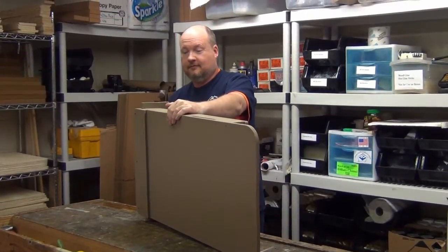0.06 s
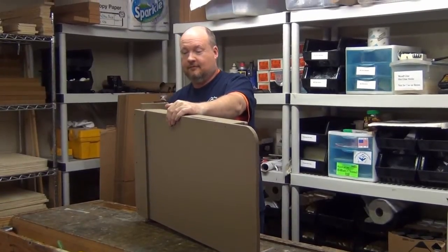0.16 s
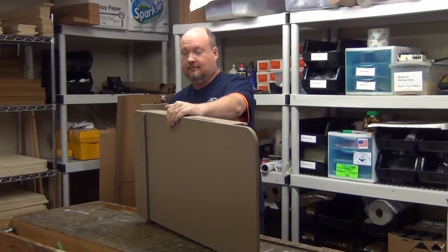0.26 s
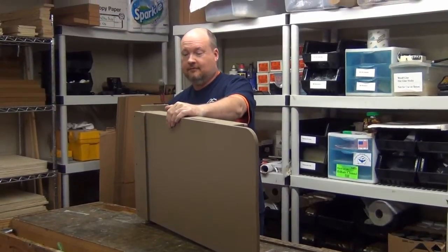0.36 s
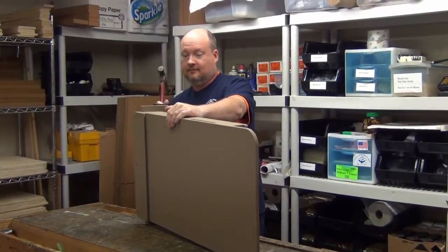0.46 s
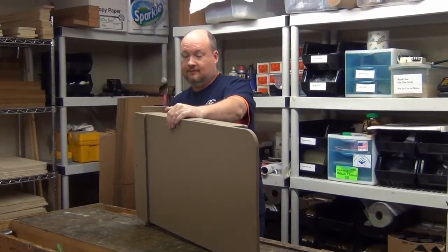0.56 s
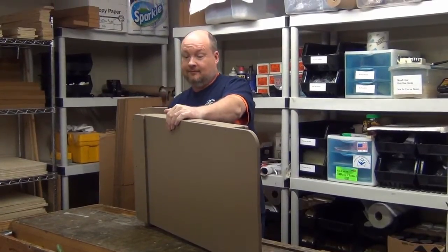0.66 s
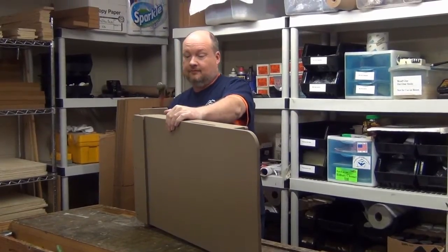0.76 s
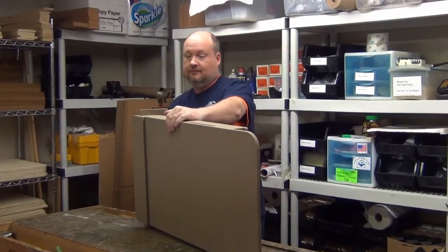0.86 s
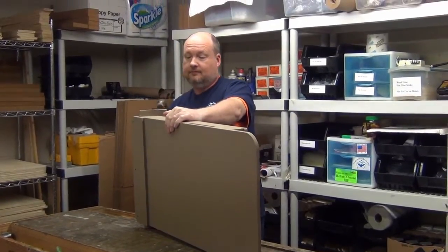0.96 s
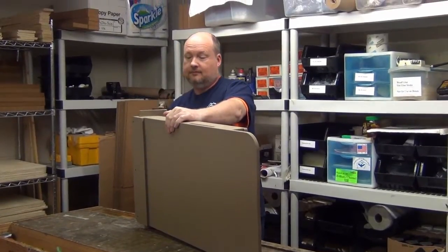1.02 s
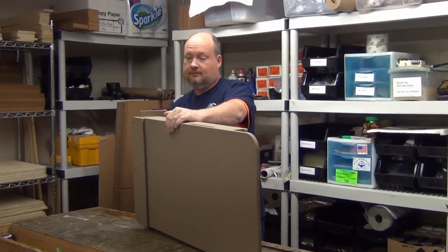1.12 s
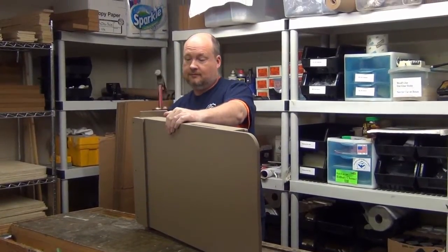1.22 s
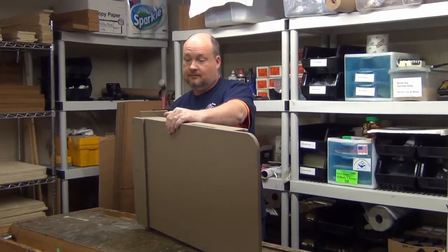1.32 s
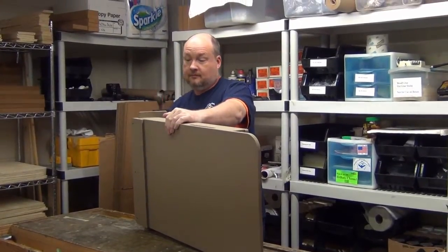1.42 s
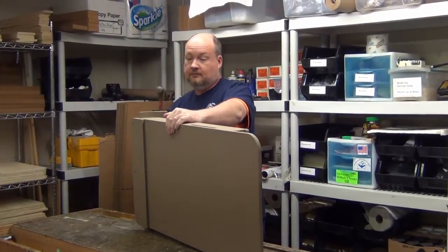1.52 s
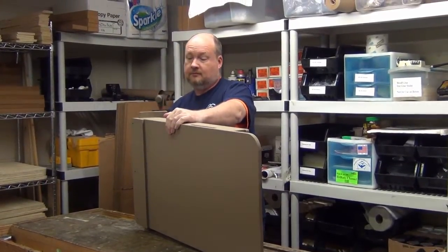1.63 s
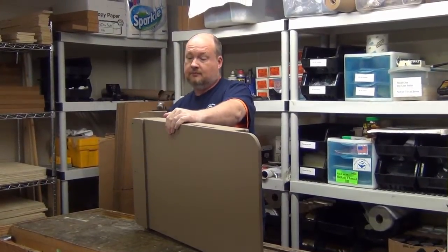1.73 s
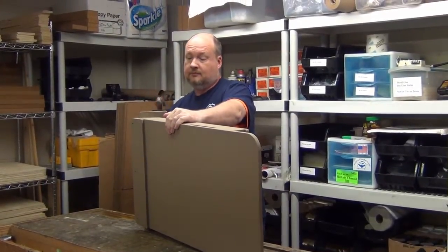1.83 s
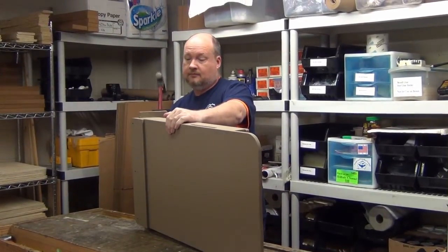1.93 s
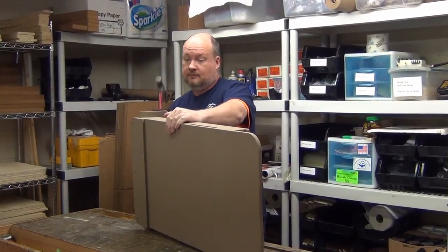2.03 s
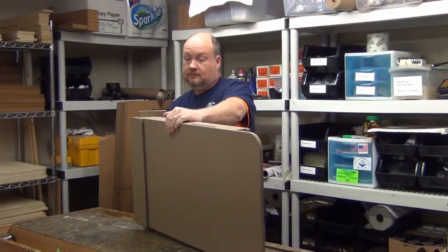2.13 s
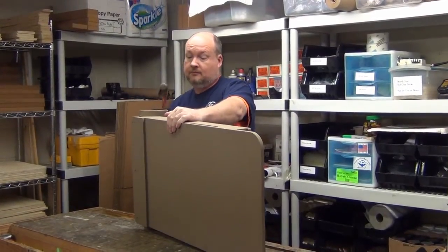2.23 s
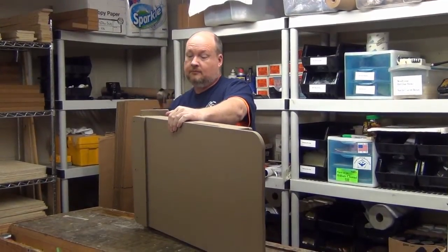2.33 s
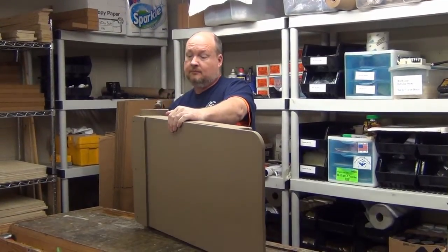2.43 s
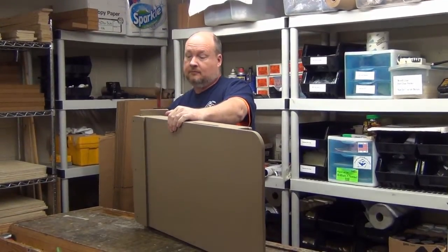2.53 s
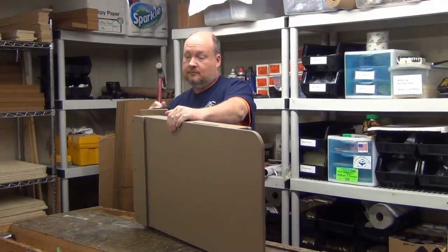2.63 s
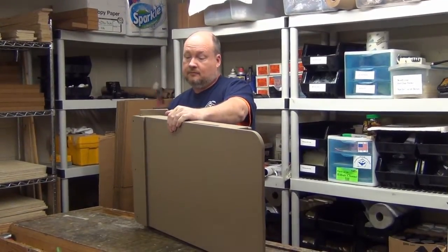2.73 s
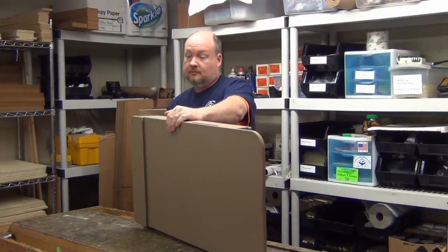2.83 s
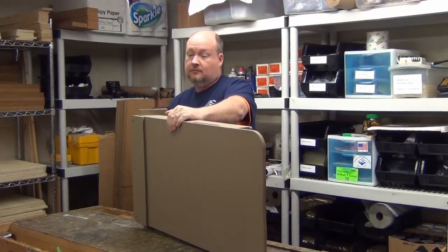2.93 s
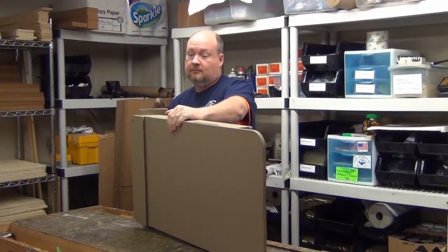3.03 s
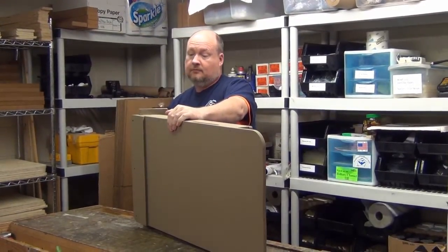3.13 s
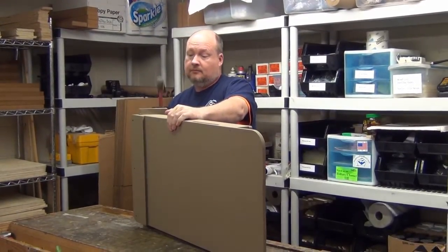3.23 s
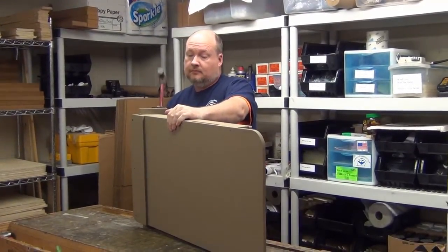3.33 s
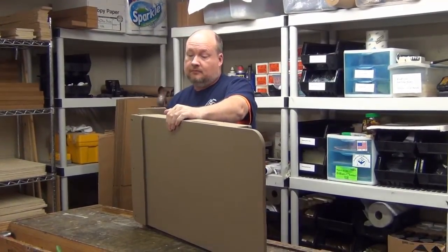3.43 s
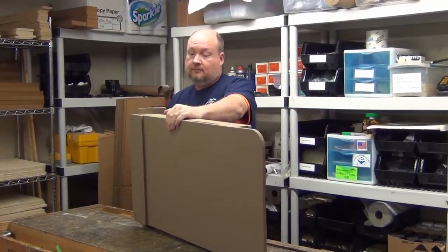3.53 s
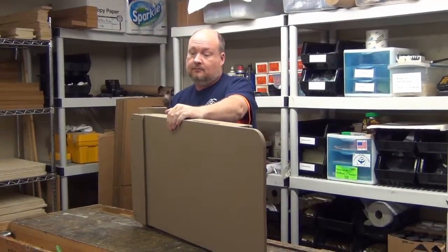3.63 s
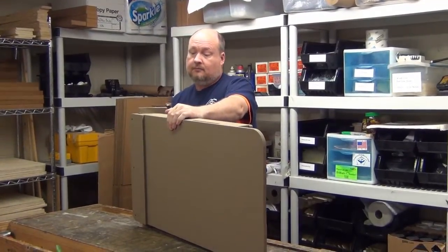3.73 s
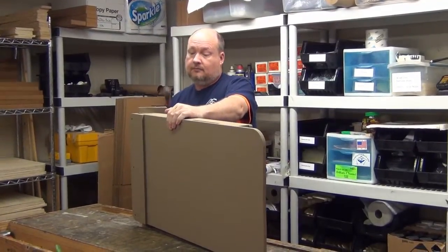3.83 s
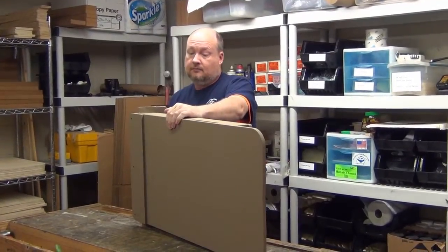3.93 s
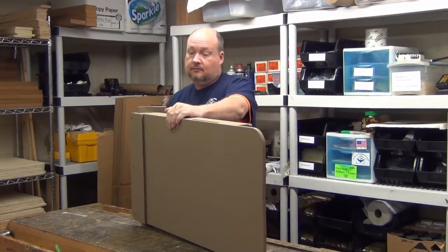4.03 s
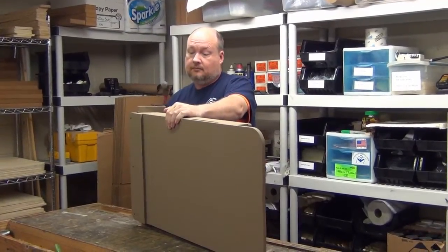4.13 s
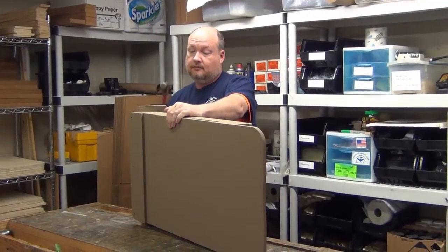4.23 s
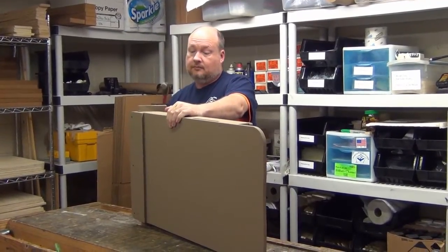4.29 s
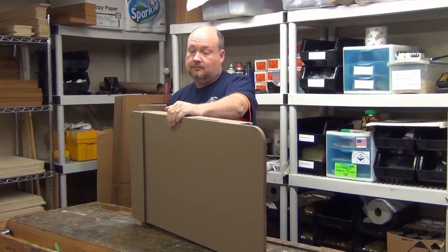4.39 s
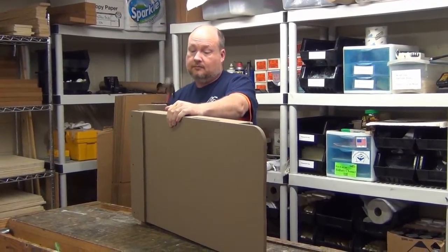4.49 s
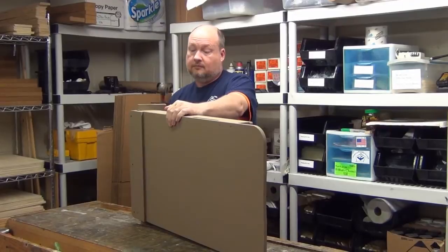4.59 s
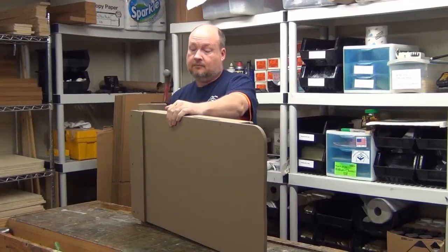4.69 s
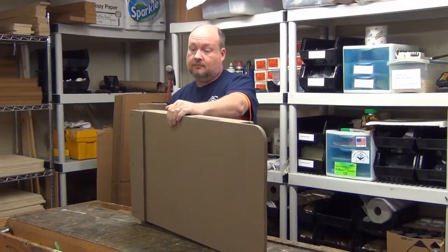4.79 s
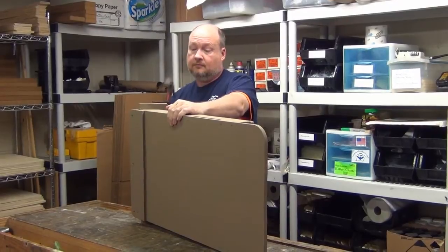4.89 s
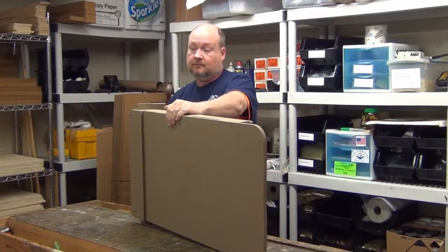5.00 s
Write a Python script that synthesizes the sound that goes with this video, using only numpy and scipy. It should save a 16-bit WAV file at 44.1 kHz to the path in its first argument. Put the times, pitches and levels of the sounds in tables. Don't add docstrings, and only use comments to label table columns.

```python
import sys
import numpy as np
from scipy import signal
from scipy.fft import rfft, irfft
from scipy.io import wavfile
from scipy.ndimage import uniform_filter1d

SR = 44100
rng = np.random.default_rng(int(sys.argv[2]) if len(sys.argv) > 2 else 0)


def voltage_ratio(decibels):
    exponent = np.asarray(decibels, float) / 20
    return 10 ** exponent


def int16_out(signal):
    q = np.round(np.clip(np.atleast_2d(signal).T, -1, 1) * 32767)
    wavfile.write(sys.argv[1], SR, q.astype(np.int16))


N = 222873

# frequency [Hz], rise time [s].
RISE = [(60, 0.052), (200, 0.0073), (450, 0.015), (1500, 0.0081), (4000, 0.012), (8000, 0.018)]


def evened(x):
    return x / np.sqrt(np.mean(x ** 2) + 1e-20)


def read(points, hz):
    f, value = np.transpose(points)
    return np.interp(np.log(hz + 1), np.log(f + 1), value)


def curve(points):
    return np.interp(np.arange(N) / SR, *np.transpose(points))


def add(mix, start_s, sound):
    at = round(start_s * SR)
    sound = sound[..., max(-at, 0):]
    part = mix[..., max(at, 0):][..., :sound.shape[-1]]
    part += sound[..., :part.shape[-1]]


def band(x, hz, width_hz):
    return signal.lfilter(*signal.iirpeak(min(hz, SR * 0.45), hz / width_hz, SR), x)


def decay(t, t60_s):
    return voltage_ratio(-60 * t / t60_s)


def attack(t, rise_s):
    return np.minimum(t / rise_s, 1)


def sine(t, hz):
    return np.sin(2 * np.pi * hz * t)


def pair(shape_db, same, size):
    a, b, c, d = rng.standard_normal((shape_db.shape[1], shape_db.shape[0], 4)).T
    same = np.clip(read(same, np.fft.rfftfreq(size, 1 / SR)), -1, 1)[:, None]
    left = a + 1j * b
    right = same * left + np.sqrt(1 - same ** 2) * (c + 1j * d)
    z = np.array([left, right]) * voltage_ratio(shape_db)
    return signal.istft(z, nperseg=size, noverlap=size * 3 // 4)[1]


def patches(frames, wide, long):
    field = rng.standard_normal((frames, 513)).T
    return evened(uniform_filter1d(uniform_filter1d(field, wide, axis=0), long, axis=1))


def drone(hz, db, wander_hz):
    drift, swell = (evened(uniform_filter1d(rng.standard_normal(N), SR // 10)) for _ in range(2))
    turns = np.cumsum(hz + wander_hz * drift) / SR
    return voltage_ratio(db + 1.2 * swell) * np.sqrt(2) * np.sin(2 * np.pi * turns)


def workshop():
    # frequency [Hz], density [dB per Hz].
    air_shape = [(25, -44), (60, 5), (95, -5), (140, -2.5), (300, 0.5), (500, -10.5), (1060, -9),
                 (2080, -16.5), (5500, -20.5), (7200, -16), (10500, -24.5), (13500, -26.5), (16000, -22)]
    # time [s], level [dB].
    air_level = [(0, -52.5), (2.7, -54.5), (4.05, -54), (4.6, -50.3)]
    # frequency [Hz], left-right likeness [-1 to 1].
    air_same = [(60, 0.59), (180, 0.85), (550, 0.82), (1650, 0.99), (4970, 0.97), (15000, 0.56)]
    # frequency [Hz], level [dB], wander [Hz].
    hum_lines = [(361, -64.5, 1), (480, -69, 1), (247, -71, 2), (632, -75, 2), (1050, -74, 6),
                 (1203, -76, 3)]
    # frequency [Hz], level [dB], wander [Hz].
    motor_lines = [(120, -59, 1), (174, -67, 1)]
    # time [s], share [0-1].
    handover = [(0, 0), (1.45, 0.1), (1.9, 0.8), (3, 1)]
    bins = np.fft.rfftfreq(1024, 1 / SR)
    air_db = read(air_shape, bins)[:, None] + 1.2 * patches(N // 256 + 5, 10, 12)
    air = voltage_ratio(curve(air_level)) * evened(pair(air_db, air_same, size=1024)[:, :N])
    share = curve(handover)
    motor = (1 - 0.9 * share) * drone(*motor_lines[0]) + (1 + 0.6 * share) * drone(*motor_lines[1])
    return air + sum(drone(*row) for row in hum_lines) + motor


def camera():
    # start [s], end [s], frequency [Hz], level [dB].
    chirp_tones = [
        (0, 1.5, 2915, -60),
        (0, 1.5, 4490, -66),
        (2.9, 3.75, 3165, -65),
        (2.9, 3.75, 4740, -64),
        (3.75, 5.05, 3110, -65),
        (3.75, 5.05, 4670, -62.5),
    ]
    frame_s, whine_hz, whine_db = 1001 / 30000, 15735, -73
    t = np.arange(N) / SR
    from_chirp_s = ((t / frame_s + 0.5) % 1 - 0.5 - 0.03) * frame_s
    gate = np.exp(-0.5 * (from_chirp_s / 0.004) ** 2)
    size = voltage_ratio(1.2 * rng.standard_normal(200))[np.round(t / frame_s).astype(int)]
    throb_db = 4 * np.sin(2 * np.pi * t / 0.09)
    out = voltage_ratio(whine_db + throb_db) * np.sqrt(2) * sine(t, whine_hz)
    for start_s, end_s, hz, db in chirp_tones:
        running = (t > start_s) & (t < end_s)
        out = out + voltage_ratio(db) * np.sqrt(2) * running * gate * size * sine(t, hz)
    return out


def click():
    start_s, db, first_hz, second_hz = (0.5845, -33, 5100, 2600)
    t, out = np.arange(400) / SR, np.zeros(500)
    add(out, 0, decay(t, 0.007) * sine(t, first_hz))
    add(out, 0.0016, decay(t, 0.003) * sine(t, second_hz))
    return start_s, voltage_ratio(db) * out


def knock(start_s, db, hz, t60_s):
    t = np.arange(SR // 4) / SR
    noise = rng.standard_normal((2, len(t)))
    scuff = band(band(noise[0], 0.9 * hz, 1400), hz, 2200)
    tap = decay(t, max(t60_s, 0.01)) * attack(t, 0.0061) * (0.41 * sine(t, hz) + scuff)
    drag = decay(t, 0.29) * attack(t, 0.028) * band(band(noise[1], 260, 750), 350, 1600)
    return start_s, voltage_ratio(db - 0.5) * (tap + 0.9 * drag)


def slide(start_s, db):
    hiss_hz, rise_s, t60_s = 7400, 0.0069, 0.19
    t = np.arange(SR // 4) / SR
    noise = rng.standard_normal((2, len(t)))
    noise = noise[0] + 0.35 * noise
    hiss = band(band(band(noise, hiss_hz, 2700), hiss_hz, 2700), hiss_hz, 6000)
    scrape = 0.15 * band(noise, 3500, 5000)
    return start_s, voltage_ratio(db - 60 * t / t60_s) * attack(t, rise_s) * (hiss + scrape)


def tick(start_s, db, hiss_db):
    hard_db = db + 30
    hz = 9100 + 9 * hard_db
    hiss_t60_s = 0.24 + 0.004 * hard_db
    t = np.arange(SR // 3) / SR
    noise = rng.standard_normal((2, len(t)))
    noise = noise[0] + 0.52 * noise
    hits = 30.0 * (rng.random(len(t)) < 150 / SR)
    grains = noise * (1 + 0.8 * uniform_filter1d(hits, size=30))
    ping = 0.6 * band(band(noise, hz, 5000), hz, 5000) + 0.5 * sine(t, hz)
    snap = decay(t, 0.0045) * attack(t, 0.0003) * ping
    hiss = voltage_ratio(hiss_db - 60 * t / max(hiss_t60_s, 0.01)) * attack(t, 0.0022)
    hiss = hiss * band(band(grains, 8300, 4700), 8950, 4400)
    lowpass = signal.butter(2, 12500, fs=SR, output="sos")
    return start_s, voltage_ratio(db - 1) * signal.sosfilt(lowpass, 2.12 * snap + 0.83 * hiss)


def rush(blow_s):
    t = np.arange(-0.022, 0, 1 / SR)
    noise = rng.standard_normal(len(t))
    swell_noise = 0.76 * band(noise, 5800, 7900) + 4.2 * band(noise, 270, 530)
    return blow_s + t[0], voltage_ratio(-33 + 1100 * t) * swell_noise


def box_boom(t, place):
    # frequency [Hz], level struck at place 0 [dB], level at place 1 [dB], t60 [s].
    box_modes = [(122.1, -10.5, -4, 0.31), (142.7, -11, 7.5, 0.3), (167.47, -2.5, -0.5, 0.37),
                 (205, -7, -1.5, 0.4), (241.9, -1, -5.5, 0.28), (257.3, 0.5, -1.5, 0.36),
                 (299.3, 5.5, 1, 0.26), (324.5, -5.5, -13.5, 0.39), (382.8, 2.5, -21, 0.36),
                 (467, -22, 0, 0.37), (488, -15, -35, 0.21), (548, -35, -42, 0.48), (600, -35, -26, 0.56),
                 (667, -6.5, -2.5, 0.24), (848, -18, -13.5, 0.38), (965, 12.5, 5, 0.031),
                 (1043, -12, -13.5, 0.26)]
    detune, share, phase, side = rng.standard_normal((len(box_modes), 4)).T[:, :, None]
    hz, here_db, there_db, t60_s = np.transpose(box_modes)[:, :, None]
    mode_db = here_db + np.clip(place, 0, 1) * (there_db - here_db) + 1.17 * share
    level = voltage_ratio(mode_db - 60 * t / (t60_s * (1 - 0.46 * place)))
    level = level * (1 - np.exp(-t / read(RISE, hz))) ** 2
    angle = 2 * np.pi * (hz * (1 + 0.007 * detune) * t + phase)
    return np.array([(level * np.sin(angle + way * 0.12 * side)).sum(0) for way in (-1, 1)])


def dense_ring(t, treble_db):
    # frequency [Hz], density [dB per Hz].
    dense_modes = [(18, -63), (30, -99), (80, -18), (150, -6), (260, -1), (420, -7), (650, -10.5),
                   (1030, -14.5), (2200, -21), (3900, -28), (6000, -27), (8000, -19.5), (11000, -40.5),
                   (15700, -46)]
    # frequency [Hz], t60 [s].
    ring_t60 = [(60, 0.36), (200, 0.26), (600, 0.26), (2000, .27), (6000, 0.28), (14000, 0.23)]
    # frequency [Hz], left-right likeness [-1 to 1].
    ring_same = [(30, .3), (70, 0.93), (250, 1), (700, 0.97), (2000, 0.96), (5000, 0.95), (9000, 0.77),
                 (15000, 0.8)]
    bins = np.fft.rfftfreq(1024, 1 / SR)
    tilt_db = treble_db * np.clip(np.log2(bins / 1500 + 1e-9), 0, 2) / 2
    lumps_db = 1.5 * patches(136, 14, 5)
    shape_db = (read(dense_modes, bins) + tilt_db)[:, None] + lumps_db
    steady = evened(pair(shape_db, ring_same, size=1024)[:, :len(t)])
    spectrum, fine_hz, ring = rfft(steady), np.fft.rfftfreq(len(t), 1 / SR), 0
    edges = np.geomspace(25, 20000, num=13)
    for lo, hi in zip(edges, edges[1:]):
        mid = np.sqrt(lo * hi)
        late_share = 0.93 if mid < 550 else 0.7
        build = (1 - late_share * np.exp(-t / read(RISE, mid))) ** 2 * attack(t, 0.00076)
        part = irfft(spectrum * ((fine_hz >= lo) & (fine_hz < hi)), len(t))
        ring = ring + build * decay(t, read(ring_t60, mid)) * part
    return ring


def shot_crack(t, place):
    burst = rng.standard_normal(len(t)) * decay(t, 0.014) * attack(t, 0.001)
    bright = 1.86 * band(band(band(burst, 9740, 2800), 7400, 1900), 8400, 3700)
    woody = band(band(burst, 2600, 1700), 2600, 1700) + 0.14 * decay(t, 0.015) * sine(t, 2700)
    return bright + voltage_ratio(-7 + 17 * place) * woody


def blow(start_s, db, crack_db, treble_db, place):
    overload_db = 19
    boom_db = 1.5 - 38 * max(0.38 - place, 0)
    t = np.arange(SR * 3 // 4) / SR
    sound = dense_ring(t, treble_db)
    sound = sound + voltage_ratio(boom_db - 2.5) * box_boom(t, place)
    sound = sound + voltage_ratio(crack_db) * shot_crack(t, place)
    return start_s - 0.0008, voltage_ratio(db + overload_db) * sound


def scene():
    # start [s], strength [dB], crack [dB], treble [dB], strike place [0-1].
    blow_events = [
        (-0.16, -2, -19, -0.5, 0.58),
        (0.7044, -8.5, -9.5, -1, 0.19),
        (1.471, -9.5, -14, -5, 0.31),
        (2.177, -10.5, -9, -2, 0.39),
        (2.846, -11, -6.5, -1.5, 0.43),
        (3.4946, -12.5, -9, 4.5, 0.56),
        (4.118, -15, -9, 2.5, 0.7),
        (4.6268, -14.5, -5, -0.5, 0.91),
        (5.023, -14, -8, 3.5, 0.7),
    ]
    # start [s], peak [dB], hiss of loosened shot [dB].
    snap_events = [(0.1377, -32.5, -34), (0.338, -34.5, -20), (0.645, -42, -18), (0.9812, -21, -20),
                   (0.9998, -20, -18), (1.094, -41, -6), (1.1714, -38, -24), (1.1995, -36, -22),
                   (1.274, -36.5, -26), (1.3384, -46, -21), (1.406, -45, -25), (1.7598, -19.5, -17.5),
                   (1.793, -18, -19), (1.7992, -30, -11), (1.8837, -34, -19), (1.9512, -29, -22),
                   (1.9959, -40, -10), (2.054, -35, -19), (2.105, -43, -25), (2.487, -28.5, -15),
                   (2.525, -36, -9), (3.4017, -46, -27), (3.811, -33, -16.5), (3.8323, -30, -9.5),
                   (3.8881, -33.5, -9), (3.9665, -33, -21), (4.007, -44, -25), (4.0477, -44, -30),
                   (4.4458, -15, -27), (4.4533, -19, -16), (4.5507, -26, -16)]
    # start [s], peak [dB].
    slide_events = [
        (1.028, -41),
        (2.46, -31),
        (2.52, -39.5),
        (2.768, -41),
        (3.132, -26),
        (3.296, -45.5),
        (3.771, -31.5),
        (4.386, -38),
        (4.897, -33),
    ]
    # start [s], peak [dB], frequency [Hz].
    lift_events = [
        (1.751, -31, 1520),
        (2.463, -26.5, 1486),
        (3.134, -25.5, 1038),
        (3.771, -29.5, 1057),
        (4.897, -31, 1070),
    ]
    # start [s], peak [dB], frequency [Hz].
    knock_events = [
        (0.156, -33, 1000),
        (0.244, -35.5, 1038),
        (0.306, -42, 1035),
        (0.988, -34.5, 1560),
        (1.072, -36.5, 1020),
        (1.862, -35.5, 990),
        (3.307, -41, 1470),
        (3.942, -38, 1066),
        (4.388, -29.5, 1015),
    ]
    mix = workshop() + camera()
    add(mix, *click())
    for start_s, db, hz in list(lift_events) + list(knock_events):
        add(mix, *knock(start_s, db, hz, t60_s=0.073))
    for start_s, _, _ in lift_events:
        add(mix, *knock(start_s + 0.036, db=-32.5, hz=833, t60_s=0.1))
    for row in slide_events:
        add(mix, *slide(*row))
    for row in snap_events:
        add(mix, *tick(*row))
    for row in blow_events:
        add(mix, *rush(row[0]))
        add(mix, *blow(*row))
    return mix


def band_limit(x):
    return signal.sosfilt(signal.butter(12, 15850, fs=SR, output="sos"), x)


def record(dry):
    # frequency [Hz], left minus right [dB].
    port_lean = [(30, 4), (80, -4), (200, -1.5), (600, -1.4), (4000, -0.9), (12000, -0.5)]
    edge_hz, recovery_db_per_s, threshold_db = 15950, 346, -11.5
    hz = np.fft.rfftfreq(N, 1 / SR)
    lean = voltage_ratio(read(port_lean, hz) * np.array([[0.5], [-0.5]]))
    dry = irfft(rfft(dry) * lean * (hz < edge_hz), N)
    power_db = 10 * np.log10(abs(uniform_filter1d((dry ** 2).mean(0), 220)) + 1e-12)
    fall_db = np.arange(N) * recovery_db_per_s / SR
    held_db = np.maximum.accumulate(power_db + fall_db) - fall_db
    over_db = np.maximum(held_db - threshold_db, 0)
    limited = dry / voltage_ratio(0.85 * uniform_filter1d(over_db, 90))
    return band_limit(1.033 * np.tanh(limited / 1.35))


dry = scene()
out = record(dry)
int16_out(out)
```